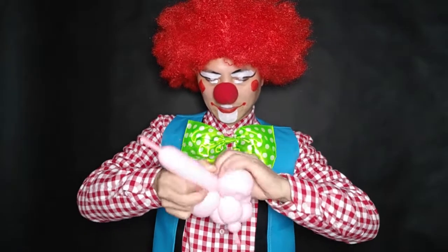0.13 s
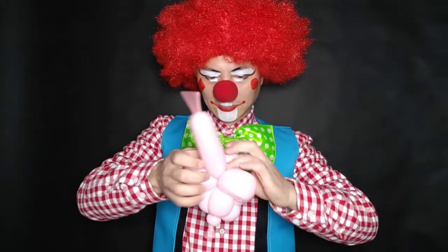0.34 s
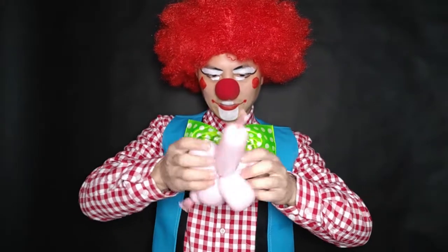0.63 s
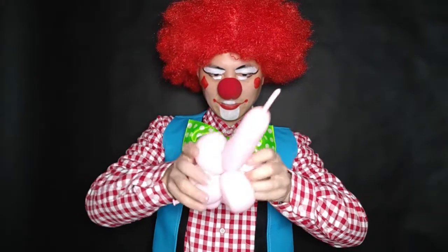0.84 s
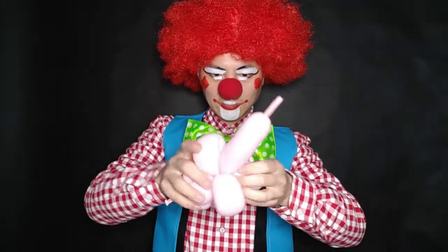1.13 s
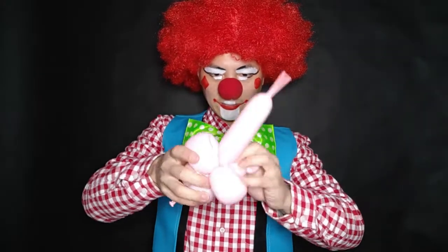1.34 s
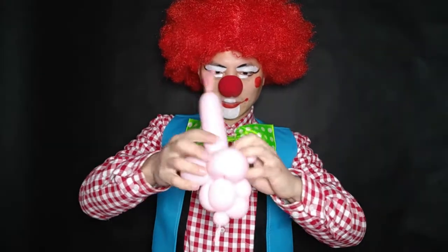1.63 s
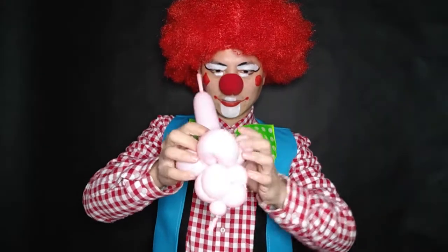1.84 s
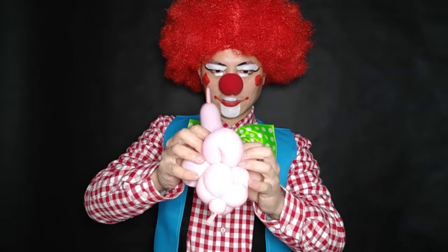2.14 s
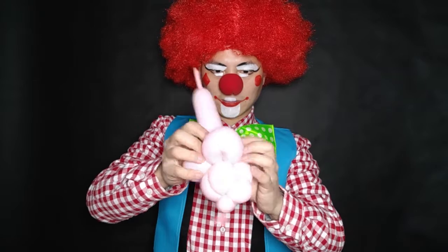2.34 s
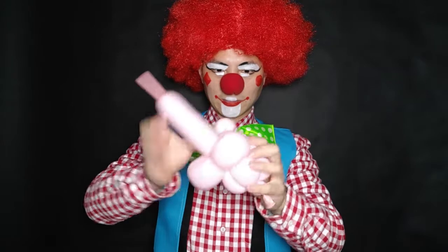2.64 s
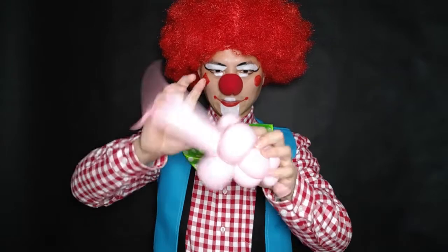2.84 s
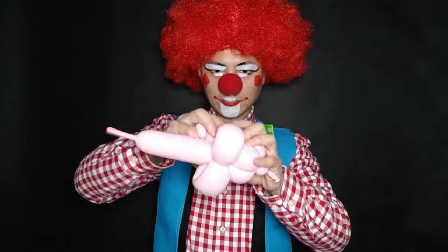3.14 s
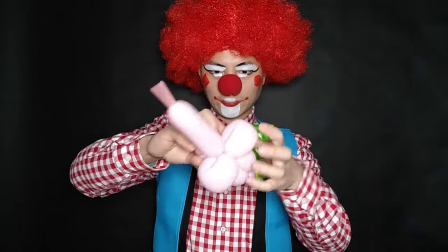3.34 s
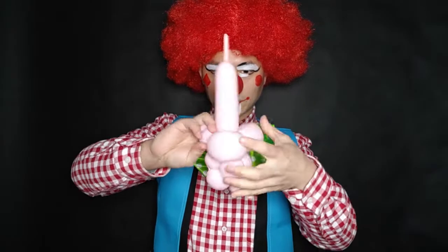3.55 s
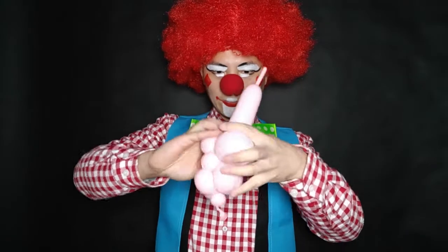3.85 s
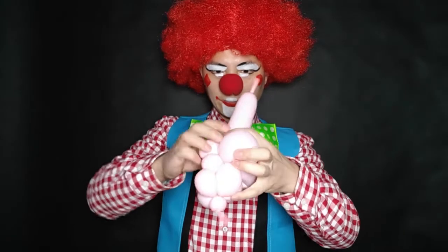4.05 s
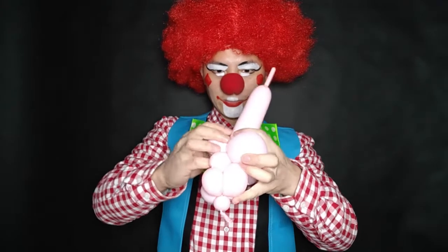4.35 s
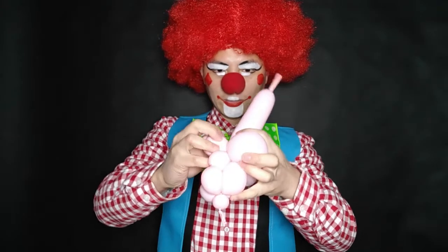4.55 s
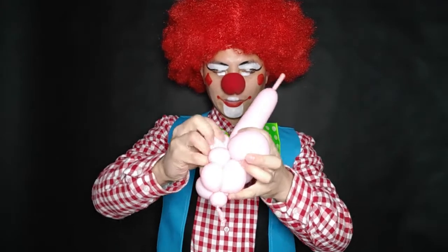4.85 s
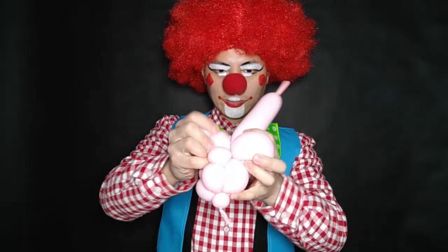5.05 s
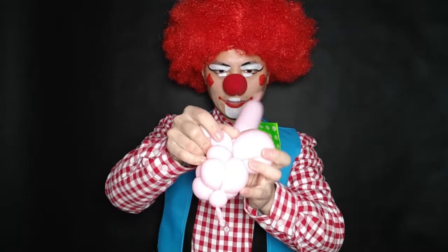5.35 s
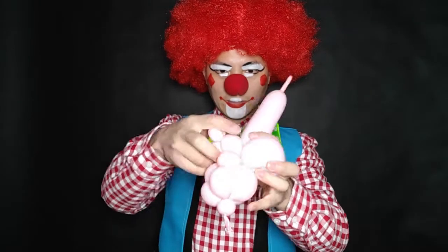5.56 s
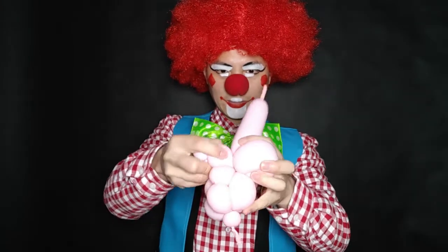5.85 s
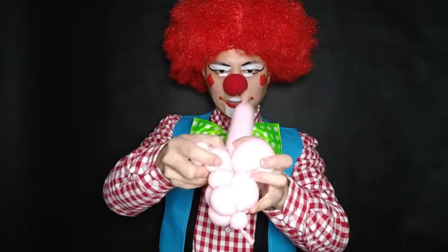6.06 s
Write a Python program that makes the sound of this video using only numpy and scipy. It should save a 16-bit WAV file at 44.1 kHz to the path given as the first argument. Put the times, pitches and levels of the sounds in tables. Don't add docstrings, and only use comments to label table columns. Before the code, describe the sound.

Quick irregular stick-slip snaps of taut balloon skin, bright and dry, each with a little hollow knock of air. They start very loud, thin to sparse creaks and muffled bumps, then thicken again into busy squeaking runs and a distorted final crack. Short faint groans and hissy palm rubbing sit beneath. Close phone microphone, small room with short reflections, low hiss.

```python
import sys
import numpy as np
from scipy import signal
from scipy.fft import rfft, irfft
from scipy.io import wavfile
from scipy.ndimage import uniform_filter1d

SR = 44100
rng = np.random.default_rng(int(sys.argv[2]) if len(sys.argv) > 2 else 0)


def digitize_waveform(pressure):
    field = np.atleast_2d(pressure).T
    bounded = np.clip(field, -1, 1)
    quanta = np.round(bounded * 32767).astype(np.int16)
    wavfile.write(sys.argv[1], SR, quanta)


def invert_db(level):
    return 10 ** (np.asarray(level, dtype=float) / 20)


N = 272957
LENGTH = 2048
SNAP_LENGTH = 768
LEAD_S = 0.003

# (frequency [Hz], decay time t60 [s], level [dB])
ROOM_DECAY = [(250, 0.12, -9), (1520, 0.18, -16.5), (4500, 0.11, -13), (10100, 0.49, -38.5)]
# (frequency [Hz], level [dB])
SKIN_COLOUR = [(88, -48), (150, -42.5), (514, -25), (805, -17.5), (1360, -10), (1690, -8), (3160, -4),
               (3840, -1.5), (5680, 2), (7320, -2.5), (10200, -24), (14800, -61.5), (16000, -78)]
# (start [s], end [s], fine hiss [dB], skin crackle [dB])
FINGER_STROKES = [(0, 0.154, -33, -38.5), (0.127, 0.32, -28.5, -28.5), (0.329, 0.406, -31, -46),
                  (.45, 0.552, -45, -59), (0.568, 0.64, -36.5, -42.5), (0.66, 0.792, -45.5, -53),
                  (.87, 0.975, -51, -54.5), (0.99, 1.113, -36, -46.5), (1.192, 1.46, -42, -61),
                  (1.558, 1.605, -32, -42), (1.724, 1.75, -46.5, -41.5), (1.791, 1.847, -38, -45.5),
                  (1.928, 2.09, -39.5, -43.5), (2.09, 2.2, -46.5, -47.5), (2.268, 2.289, -38, -33),
                  (2.426, 2.479, -35.5, -38), (2.517, 2.633, -41.5, -47.5), (2.66, 2.816, -34, -41.5),
                  (2.84, 2.96, -39, -45), (3.082, 3.339, -35, -42), (3.36, 3.447, -41, -54),
                  (3.599, 3.633, -36.5, -43), (3.658, 3.825, -36.5, -47), (3.812, 3.914, -43.5, -49.5),
                  (3.926, 4.082, -36.5, -42), (4.117, 4.218, -48, -46.5), (4.253, 4.499, -37.5, -38),
                  (4.587, 4.685, -50, -47), (4.694, 4.985, -37, -38), (5.035, 5.06, -29, -36),
                  (5.129, 5.174, -31.5, -34), (5.232, 5.427, -33, -30.5), (5.492, 5.715, -35.5, -40.5),
                  (5.781, 5.839, -38, -45.5), (5.905, 6.19, -32.5, -36)]
# (time [s], squeeze on the hollow body [dB], shuffle of the palms [dB])
HAND_SHIFTS = [(0.0, -41, -46), (0.14, -57, -59), (0.4, -61.5, -58.5), (0.9, -55.5, -59.5),
               (1.17, -41.5, -62), (1.55, -59, -67.5), (2.12, -61.5, -61.5), (2.3, -60.5, -66.5),
               (2.96, -59.5, -59), (3.15, -57, -58), (3.5, -69, -62), (3.9, -57.5, -59.5), (4.77, -49, -79),
               (5.07, -55.5, -59), (5.27, -45, -72), (5.55, -57.5, -58), (5.81, -51.5, -66),
               (6.19, -55.5, -55.5)]
# (time [s], peak [dB], pitch [Hz])
BUBBLE_BUMPS = [(0.378, -44, 250), (0.448, -41, 312), (0.468, -36, 328), (0.521, -49, 129),
                (0.576, -38, 210), (0.63, -34, 342), (0.688, -39.5, 236), (0.703, -36.5, 250),
                (0.94, -26.5, 203), (1.599, -57, 283), (1.716, -27.5, 310), (1.734, -32, 267),
                (2.01, -23.5, 250), (2.573, -39, 223), (2.756, -35.5, 130), (2.821, -39, 170),
                (2.921, -16.5, 278), (2.937, -13, 236), (3.072, -30, 300), (3.085, -20.5, 260),
                (4.284, -37, 240), (4.312, -38, 420), (4.333, -34, 450), (4.36, -30, 400),
                (4.378, -36, 450), (4.41, -41, 380), (5.226, -29.5, 452), (5.126, -25.5, 330),
                (5.143, -32.5, 330), (3.419, -40, 173), (3.617, -35.5, 230), (3.836, -43.5, 156),
                (4.091, -41.5, 440), (5.371, -29.5, 285), (5.687, -38.5, 263), (6.004, -48, 215),
                (6.018, -29, 310)]
# (start [s], length [s], level [dB], first pitch [Hz], last pitch [Hz])
BUBBLE_GROANS = [(.2, 0.11, -27.5, 516.3, 521), (1.584, 0.034, -46.5, 270, 270),
                 (1.752, .11, -47, 454, 602), (2.08, 0.059, -56, 128, 280), (2.169, 0.067, -53, 425, 490),
                 (2.189, 0.065, -55, 278, 280), (2.263, 0.046, -53, 398, 400),
                 (2.418, 0.048, -54, 352, 724), (2.56, 0.072, -52.5, 436, 449),
                 (2.646, 0.034, -40, 497, 460), (2.707, 0.049, -51, 402, 415),
                 (2.807, 0.021, -45.5, 474, 450), (3.2, 0.029, -50, 590, 440),
                 (3.316, 0.013, -34, 1540, 1500), (3.324, 0.015, -34.5, 1520, 1500),
                 (4.436, 0.024, -44, 423, 420), (4.519, 0.011, -37, 1200, 1200),
                 (0.92, 0.036, -48, 810, 800), (4.684, 0.028, -41, 595, 700), (1.18, 0.083, -52, 453, 443),
                 (3.331, 0.07, -49.5, 300, 290), (3.409, 0.025, -51, 266, 180),
                 (4.087, 0.031, -47, 485, 460), (4.253, 0.02, -57, 620, 607),
                 (4.58, 0.064, -48.5, 573, 570), (4.827, 0.054, -38, 614, 513),
                 (5.52, 0.039, -37.5, 470, 439), (5.68, 0.042, -43.5, 517, 487),
                 (5.785, 0.019, -38, 537, 560), (6.095, 0.019, -33, 500, 490)]
# (from [s], ring [Hz], ring over its neighbours [dB],
# air drum [Hz], drum against the snap [dB])
SKIN_PATCHES = [(0, 2780, -19, 543, -37), (0.14, 3915, 10, 515, -24.5), (0.51, 1610, 9, 450, -41),
                (1.204, 3830, 6, 500, -31), (1.44, 6480, -5, 730, -34), (1.923, 4680, 4, 1170, -17.5),
                (2.237, 3160, -9, 427, -42), (2.918, 1626, 16.5, 432, -20), (3.125, 4590, 15.5, 470, -49),
                (3.284, 1530, 4, 446, -65), (3.522, 2870, 3, 716, -33.5), (3.904, 1356, 25.5, 1100, -19.5),
                (4.24, 3830, -0.5, 546, -22.5), (4.55, 5250, 9, 610, -19), (4.702, 2280, -16, 1220, -50),
                (4.784, 3780, -16, 650, -38), (4.878, 5900, 22.5, 1060, -43), (5.028, 3580, 6, 534, -26.5),
                (5.111, 2760, 4, 786, -13), (5.303, 4050, 12, 840, -46), (5.426, 4480, -15, 496, -32.5),
                (5.592, 1550, 17.5, 1160, -45), (5.785, 6380, 16, 580, -43), (5.969, 3450, 11.5, 642, -33),
                (1.34, 5230, -1.5, 510, -27.5), (5.201, 3410, 4, 800, -18), (5.332, 4460, 6, 800, -25.5),
                (1.58, 3590, -8, 680, -22.5), (1.7, 2950, 15, 800, -20.5), (3.07, 1600, 28.5, 420, -16),
                (0.9, 3510, 1, 420, -35.5), (2.64, 2400, 0.5, 480, -49), (5.99, 4990, 3, 700, -27)]
# (time [s], peak [dB])
RUBBER_SLIPS = [(0.0084, -17), (0.0327, -0.5), (0.0424, -2.0), (0.05, -13), (0.06, 0.5), (0.0816, 2),
                (0.0943, 2), (0.1151, -2.0), (0.1506, -0.5), (0.1563, 4), (0.1618, -5), (0.1658, 1),
                (0.1728, 1.5), (0.1773, -3), (0.1822, 1.5), (0.186, -3), (0.1905, 4), (0.202, -18),
                (0.209, 11), (0.2128, -2.5), (0.2189, 2), (0.2609, -1), (0.274, 2.5), (0.309, -16),
                (0.455, -40), (0.4777, -43), (0.5133, -31), (0.5179, -32), (0.5217, -31), (0.5254, -34),
                (0.5291, -21), (0.5533, -34), (0.5646, -21), (0.569, -18.5), (0.5836, -15.5),
                (0.6195, -30), (0.6248, -15.5), (0.672, -37), (0.6855, -29), (0.7003, -27), (0.8469, -40),
                (0.9379, -30.5), (0.9435, -24), (0.9543, -32.5), (0.9645, -40), (0.9728, -35),
                (0.9904, -9.5), (1.008, -5), (1.0216, -4.0), (1.0296, -15), (1.0475, -7), (1.0567, 0.5),
                (1.0738, -3), (1.126, -30), (1.1298, -28), (1.14, -25.5),
                (1.156, -23), (1.1944, -29), (1.2064, -25), (1.2155, 3), (1.2213, 0.5), (1.2258, -5),
                (1.2413, -1.5), (1.2575, 7), (1.2934, -2), (1.3095, -2.5), (1.316, -12), (1.3372, -23),
                (1.348, 1), (1.3509, -3), (1.3574, -7), (1.397, -9.5), (1.433, -22), (1.4448, -14.5),
                (1.459, -12), (1.4746, -24), (1.4875, -19), (1.527, -11.5), (1.5443, -15), (1.5874, -2.5),
                (1.67, -42), (1.6736, -43), (1.6973, -49), (1.7305, -27), (1.7831, -16), (1.7892, -10.5),
                (1.7962, -22), (1.8102, -27), (1.8276, -21.5), (1.9254, -12.5), (1.9694, 0), (1.9885, 2.5),
                (1.997, -7), (2.0084, -14), (2.0171, -1.0), (2.0967, -32), (2.1313, -20.5), (2.1414, -27.0),
                (2.1497, -24), (2.1568, -24), (2.2396, -31.0), (2.2714, -19), (2.2907, -8.5),
                (2.3085, -19.5), (2.3635, -38.0), (2.3865, -45), (2.3997, -33), (2.4088, -13),
                (2.4203, -19), (2.4369, -9), (2.5136, -19), (2.521, -16.5),
                (2.5286, -20.5), (2.5934, -38), (2.5984, -41), (2.6098, -30), (2.6529, -21),
                   (2.656, -23.0), (2.6673, -19.0), (2.6693, -26), (2.6996, -26), (2.719, -18.0),
                   (2.7279, -16), (2.7723, -12), (2.7784, -9.5), (2.7961, -9.5), (2.8217, -19),
                   (2.8417, -29), (2.844, -31), (2.8636, -38), (2.8681, -28.5), (2.8819, -31),
                   (2.9196, -5.5), (2.936, -4.5), (2.9542, -19), (2.9729, -25), (3.0032, -19), (3.033, -27),
                   (3.05, -30), (3.0738, -25.5), (3.0853, -13), (3.1358, -13.5), (3.152, -12),
                   (3.1727, -7.0), (3.1878, -10), (3.194, -4.5), (3.205, -6.5), (3.2336, -15), (3.245, -20),
                   (3.265, -11), (3.2901, -7.0), (3.3184, -15.5), (3.3315, -19), (3.4459, -25),
                   (3.4533, -20.5), (3.5246, -38), (3.5374, -38), (3.556, -21), (3.5783, -10), (3.5916, -8),
                   (3.6139, -26), (3.6624, -10), (3.6768, -9), (3.693, -20), (3.708, -4), (3.7363, -3.5),
                   (3.747, -8), (3.7509, -3),
                (3.7615, -3), (3.9069, -20), (3.9108, -30), (3.925, -23.5), (4.012, -19.5), (4.0237, -17),
                 (4.0873, -18), (4.1494, -28), (4.157, -26), (4.165, -29.5), (4.242, -30), (4.2487, -19),
                 (4.2582, -24), (4.2664, -26), (4.2828, 3), (4.3014, -11.0), (4.311, -2), (4.3313, 0.5),
                 (4.3377, -2), (4.3428, -8), (4.3602, -0.5), (4.378, -3.5), (4.3877, -7), (4.3957, -15),
                 (4.4112, -5), (4.4213, -9.5), (4.4251, -12.5), (4.4338, -12), (4.4374, -13), (4.4442, -17),
                 (4.4637, -19), (4.4907, -17.5), (4.5273, -21), (4.5881, -22), (4.601, -27), (4.6229, -25),
                 (4.6925, -23.5), (4.7056, 6.5), (4.71, 1.5), (4.7175, -2.5), (4.7703, -22), (4.787, -13),
                 (4.7912, -19.0), (4.7995, -13), (4.8128, -3.5), (4.819, 2.5), (4.825, -1), (4.8402, -13),
                 (4.8535, -5.5), (4.8811, -23), (4.9095, -4.5), (4.9256, -5), (4.9447, -22), (4.971, -10.0),
                 (4.987, -9), (5.03, -9),
                (5.0433, 1), (5.0547, 0.5), (5.1132, -28), (5.1259, 2), (5.134, -9.5), (5.1418, 1.5),
                 (5.1495, -5.5), (5.1586, -15), (5.173, -14.5), (5.1851, -18), (5.19, -23), (5.2055, -15),
                 (5.2142, -13.0), (5.2265, 2), (5.2298, -2.5), (5.254, -4), (5.3002, -14.0), (5.3066, -4),
                 (5.3101, 2.5), (5.3237, 4), (5.3369, 7), (5.3603, 7), (5.4044, -4.5), (5.429, -10),
                 (5.4342, -13.0), (5.4877, -3), (5.512, -11), (5.5261, -20), (5.5378, -11), (5.5418, -9),
                 (5.548, -8), (5.5949, -6), (5.6127, -0.5), (5.6387, -10), (5.656, -24), (5.67, -23),
                 (5.6887, -11.5), (5.7174, -17.5), (5.7339, -23), (5.7767, -17), (5.7878, -7.5),
                 (5.791, -18.0), (5.8015, -23), (5.831, -34), (5.8651, -19), (5.8894, -8), (5.896, -4),
                 (5.9089, -2.5), (5.9305, -12.0), (5.965, -7), (5.972, 2.5), (6.0017, -14), (6.008, 1),
                 (6.1009, -1.5), (6.109, -11), (6.1874, -15.0)]
# (time [s], peak [dB])
EXTRA_SLIPS = [(.001, -3), (0.2013, 12), (0.2035, 2), (.2092, 9.5), (0.2132, 8.5), (0.2176, 4),
               (1.351, 10.5), (5.3611, 10.5), (5.9719, 9), (6.0, 8.5), (6.0026, 12.5), (6.007, 13.5),
               (6.012, 6), (6.016, 18), (6.0202, 7.5)]
GATE_EDGES = [0, 300, 650, 1300, 2700, 4900, 7600, 22050]
GATE_THRESHOLDS = [-3, 3, 7.5, 3.5, -2, -4.5, 0.5]


def band(x, lo_hz, hi_hz, order=2):
    return signal.sosfilt(signal.butter(order, [lo_hz, hi_hz], "bandpass", fs=SR, output="sos"), x)


def colour(x, points):
    hz, db = np.transpose(points)
    grid = np.arange(LENGTH // 2 + 1) * SR / LENGTH
    log_gain = np.interp(np.log(grid + 1), np.log(hz), db) * np.log(10) / 20
    cepstrum = irfft(log_gain)
    cepstrum[1:LENGTH // 2] *= 2
    cepstrum[LENGTH // 2 + 1:] = 0
    response = irfft(np.exp(rfft(cepstrum)))
    return signal.fftconvolve(np.atleast_2d(x), response[None], axes=1)[:, :np.shape(x)[-1]]


def rings(hz, t60, lag=0., size=LENGTH):
    t = np.clip(np.arange(size) / SR - np.asarray(lag)[..., None], 0, None)
    decay = np.exp(-np.log(1000) * t / np.asarray(t60)[..., None])
    return np.sin(2 * np.pi * np.asarray(hz)[..., None] * t) * decay


def peak_one(x):
    return x / np.abs(x).max(axis=-1, keepdims=True)


def place(times, shapes, lead=0.):
    early = int(lead * SR)
    out = np.zeros(N + LENGTH + early)
    starts = np.round(np.clip(times * SR, 0, N - 1)).astype(int)
    np.add.at(out, starts[:, None] + np.arange(LENGTH), shapes)
    return out[early:N + early]


def curves(table):
    s, *columns = np.transpose(table)
    return [np.interp(np.arange(N) / SR, s, column) for column in columns]


def walk(rate):
    hold = int(SR / rate)
    steps = np.repeat(rng.standard_normal(N // hold + 1), hold)
    return uniform_filter1d(steps, hold // 2)[:N]


def grains(rate, spread_db, smooth):
    sizes = invert_db(spread_db * np.minimum(rng.exponential(size=N), 5))
    clicks = (rng.random(N) < rate / SR) * rng.standard_normal(N) * sizes
    return clicks + smooth * rng.standard_normal(N)


def floor_hiss():
    return band(rng.standard_normal(N), 40, 7000, order=4) * invert_db(-66)


def room(x):
    hz, t60, db = np.transpose(ROOM_DECAY)
    t = np.arange(SR // 2) / SR
    tail = 0
    for low_hz in 60 * 2 ** np.arange(8):
        middle = np.log(low_hz * np.sqrt(2))
        level_db = np.interp(middle, np.log(hz), db)
        fade = invert_db(level_db - 60 * t / np.interp(middle, np.log(hz), t60))
        tail = tail + fade * band(rng.standard_normal(len(t)), low_hz, 2 * low_hz)
    tail = tail * np.clip((t - 0.002) / 0.0015, 0, 1) / 8
    return x + signal.fftconvolve(x, tail)[:N]


def strokes():
    rise_db_s, sag_db_s, fall_db_s, rest_db = 705, 10, 242, -62.5
    start, end, *levels = np.transpose(FINGER_STROKES)[..., None]
    t = np.arange(0, N, 64) / SR
    rise = rise_db_s * np.minimum(t - start, 0)
    sag = sag_db_s * (t - (start + end) / 2)
    fall = fall_db_s * np.maximum(t - end, 0)
    shape_db = rise - sag - fall
    loudest = [np.maximum((db + shape_db).max(axis=0), rest_db) for db in levels]
    return [np.interp(np.arange(N) / SR, t, db) for db in loudest]


def rubbing():
    hiss_db, skin_db = strokes()
    body_db, rumble_db = curves(HAND_SHIFTS)
    grip_db = 3.13 * walk(45)
    fine = colour(grains(820, 0.22, 0.1), SKIN_COLOUR)[0]
    knocks = grains(900, 2.2, 0.12)
    shuffle = grains(270, 0.45, 0.061)
    body_db = body_db + 0.67 * (skin_db - skin_db.mean())
    parts = [
        (band(fine, 4350, 17000, order=8), hiss_db + grip_db),
        (band(rng.standard_normal(N), 5110, 5970, order=6), hiss_db - 3.5),
        (band(rng.standard_normal(N), 9500, 15000, order=6), hiss_db + grip_db - 29),
        (band(fine, 1320, 3730, order=4), skin_db + 1.1 * grip_db + 2.0 * walk(30)),
        (band(knocks, 440, 1370, order=3), body_db + 5.8 * walk(30)),
        (band(shuffle, 77, 480), rumble_db + 4.5 * walk(23)),
    ]
    return sum(part / part.std() * invert_db(db) for part, db in parts)


def bumps():
    s, db, hz = np.transpose(BUBBLE_BUMPS)
    cycles = 6.9
    low = rings(0.87 * hz, 1.08 * cycles / hz, 0.0018)
    high = rings(1.277 * hz, 0.43 * cycles / hz)
    thud = peak_one(band(low + 1.32 * high, 102, 1030))
    return place(s - 0.82 / hz, invert_db(db - 1.5)[:, None] * thud)


def groans():
    edge_s, wobble_depth, throb_db = 0.011, 0.081, 6
    t = np.arange(8192) / SR
    wobble, throb = walk(110), invert_db(throb_db * walk(140))
    out = np.zeros(N + len(t))
    for start, length, db, first_hz, last_hz in BUBBLE_GROANS:
        at = int(start * SR) + np.arange(len(t))
        now = np.minimum(at, N - 1)
        glide_hz = first_hz + (last_hz - first_hz) * np.minimum(t / length, 1)
        hz = glide_hz * (1 + wobble_depth * wobble[now])
        shape = np.clip(np.minimum(t, length - t) / edge_s + 0.5, 0, 1)
        shape = shape * np.minimum(t / 0.00071, 1)
        hum = np.sin(2 * np.pi * np.cumsum(hz) / SR)
        out[at] += invert_db(db - 3.5) * shape * throb[now] * hum
    return out[:N]


def skin_snaps(patch, ring_hz, ring_db):
    centre_hz, spread_octaves = 5100, 0.97
    count = len(patch)
    shared = rng.standard_normal((len(SKIN_PATCHES), 3, 23))[patch]
    own = rng.standard_normal((count, 2, 23))
    detune = np.exp(0.038 * shared[:, 0, :1] + 0.047 * shared[:, 0, 1:])
    hz = np.column_stack([ring_hz, np.geomspace(1400, 13000, num=22) * detune])
    mode_db = np.maximum(-4 * (np.log2(hz / centre_hz) / spread_octaves) ** 2, -14)
    mode_db = mode_db + np.column_stack([ring_db, 2.5 * shared[:, 1, 1:]]) + 2.5 * own[:, 0]
    cycles = np.append(17, np.full(22, 14))
    lag = np.abs(1.664 + 0.5436 * shared[:, 2] + 0.073 * own[:, 1]) / hz
    modes = rings(hz, cycles / hz, LEAD_S + lag, size=SNAP_LENGTH)
    wave = peak_one((modes * invert_db(mode_db)[..., None]).sum(axis=1))
    t = np.arange(SNAP_LENGTH) / SR - LEAD_S
    creep = invert_db(-16) * np.exp(-np.abs(t) / 0.0006) * (t < 0)
    creep = creep * rng.standard_normal((count, SNAP_LENGTH))
    snap = np.pad(wave + band(creep, 1300, 9000), ((0, 0), (0, LENGTH - SNAP_LENGTH)))
    return peak_one(colour(snap, SKIN_COLOUR))


def air_drum(hz):
    drum = rings(hz, 6.15 / hz, LEAD_S) + 0.51 * rings(1.58 * hz, 7 / hz, LEAD_S)
    return peak_one(band(drum, 400, 6500))


def slips():
    s, db = np.transpose(RUBBER_SLIPS + EXTRA_SLIPS)
    patches = np.array(sorted(SKIN_PATCHES))
    patch = np.searchsorted(patches[1:, 0], s)
    ring_hz, ring_db, drum_hz, drum_db = patches[patch, 1:].T
    snap = skin_snaps(patch, ring_hz, ring_db)
    drum = invert_db(drum_db + 4.0)[:, None] * air_drum(drum_hz)
    crest_s = np.abs(snap).argmax(axis=1) / SR - LEAD_S
    return place(s - crest_s, invert_db(db - 1.5)[:, None] * (snap + drum), LEAD_S)


def scene():
    return (room(slips() + bumps() + groans()) + rubbing() + floor_hiss())[None]


def suppress(x):
    depth_db, memory_s, block, hop = 3.5, 0.29, 1024, 512
    hz, _, frames = signal.stft(x, SR, nperseg=block, noverlap=block - hop)
    which = np.clip(np.searchsorted(GATE_EDGES, hz) - 1, 0, None)
    power = np.abs(frames) ** 2
    bands = range(len(GATE_EDGES) - 1)
    level_db = np.array([10 * np.log10(power[which == k].mean(axis=0) + 1e-14) for k in bands])
    keep = np.exp(-hop / SR / memory_s)
    first_db = level_db[:, :1]
    recent_db = signal.lfilter([1 - keep], [1, -keep], level_db - first_db, axis=1) + first_db
    shut = level_db - recent_db < np.array(GATE_THRESHOLDS)[:, None]
    gain = invert_db(-depth_db * shut)[which]
    return signal.istft(frames * gain, SR, nperseg=block, noverlap=block - hop)[1][:N]


def low_pass(x):
    return signal.sosfilt(signal.butter(12, 16340, fs=SR, output="sos"), x)


def record(dry):
    clipped = np.clip(dry[0], -0.99, 0.99)
    finished = suppress(clipped)[None]
    return low_pass(finished)


dry = scene()
out = record(dry)
digitize_waveform(out)
```